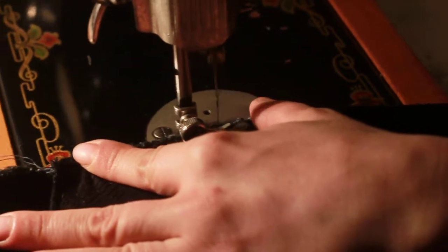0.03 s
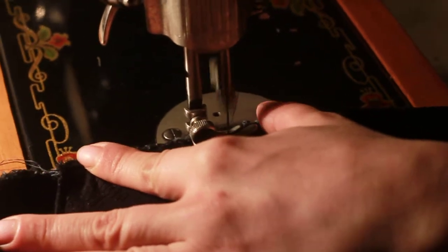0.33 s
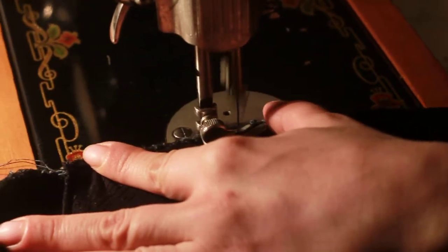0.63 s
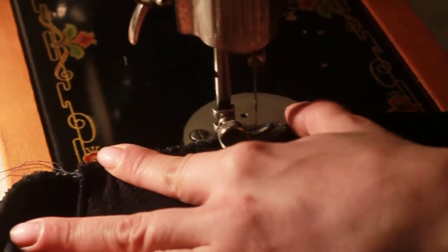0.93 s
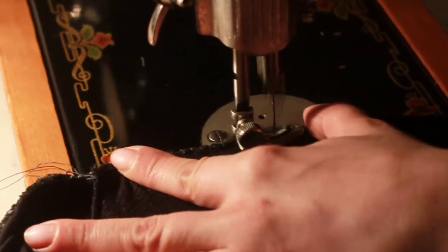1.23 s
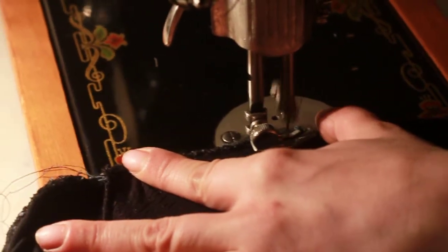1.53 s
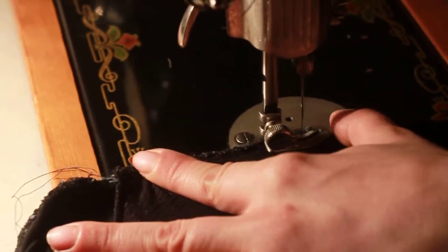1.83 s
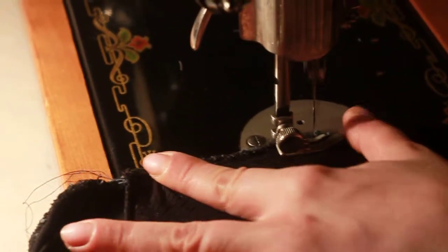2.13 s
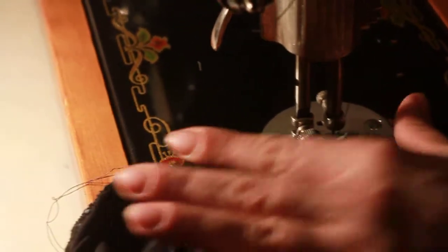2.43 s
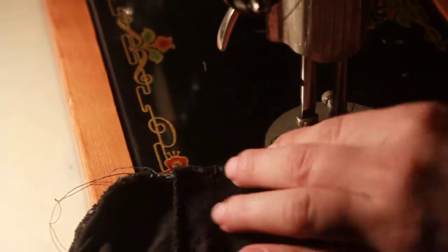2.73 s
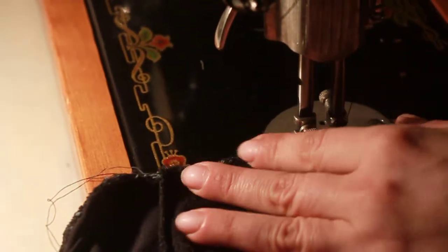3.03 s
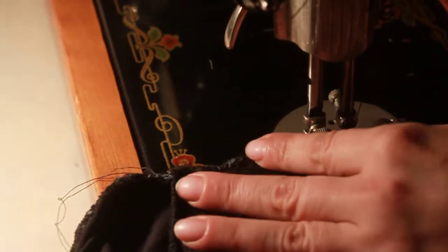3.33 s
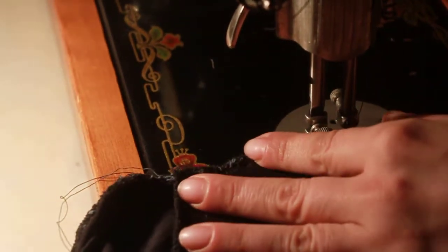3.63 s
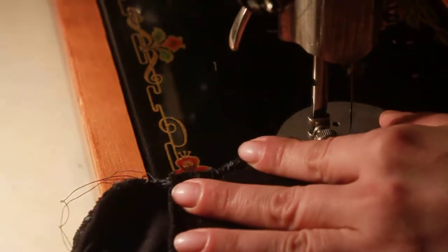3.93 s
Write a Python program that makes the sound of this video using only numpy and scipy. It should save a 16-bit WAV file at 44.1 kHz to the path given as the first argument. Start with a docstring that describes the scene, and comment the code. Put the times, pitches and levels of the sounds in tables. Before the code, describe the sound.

An old sewing machine clatters close by, about four stitches a second, with steel clacks, sliding hiss and thuds in its wooden table. It coasts to a stop at about 2.3 seconds. Faint cloth rustles, small clicks and two drip-like plinks follow over quiet room noise. A sharp, ringing metal click comes at 3.6 seconds, and the machine starts again at around 3.8 seconds.

```python
"""An old sewing machine rattles on a wooden table, about four stitches a second, over faint room noise.
Each stitch is a steel clack, a sharp snap, a thud in the table and the hiss of sliding steel.
The machine coasts to a stop. While the fabric is moved come soft rustles, small clicks, two
drip-like plinks and one ringing metal click in the small room. Then the machine starts again."""
import sys
import numpy as np
from scipy import signal
from scipy.fft import rfft, irfft
from scipy.io import wavfile

SR = 44100
rng = np.random.default_rng(int(sys.argv[2]) if len(sys.argv) > 2 else 0)


def inscribe(sig):
    """Save sig as 16-bit PCM at rate SR to the path in sys.argv[1].

    A 1-D sig is mono; a 2-D sig holds one channel per row.
    Samples are clipped to [-1, 1] before scaling.
    """
    pcm = np.round(np.clip(np.atleast_2d(sig).T, -1, 1) * 32767)
    wavfile.write(sys.argv[1], SR, pcm.astype(np.int16))


N = 176400
TIME = np.arange(N) / SR


def amp(db):
    """Turns decibels into gain."""
    return 10 ** (np.asarray(db) / 20)


def unit(x):
    """Scales to an average power of one."""
    return x / np.sqrt(np.mean(x ** 2) + 1e-20)


def curve(points, at):
    """Joins points with straight lines."""
    return np.interp(at, *np.transpose(points))


def spectrum(points, hz):
    """Joins points along a scale of octaves."""
    f, value = np.transpose(points)
    return np.interp(np.log(hz + 1), np.log(f), value)


def colour(x, points, resonances=()):
    """Gives a sound a broad tone colour, with ringing pitches on top."""
    size = 8192
    hz = np.fft.rfftfreq(size, 1 / SR)
    peaks = sum((amp(db) - 1) / (1 + (2 * (hz - f) / width) ** 2) for f, width, db in resonances)
    gain = amp(spectrum(points, hz)) * (1 + peaks)
    # make the ringing come after each hit, never before
    cepstrum = irfft(np.log(np.maximum(gain, 1e-6)))[:size // 2]
    cepstrum[1:] *= 2
    ring = irfft(np.exp(rfft(cepstrum, size)))
    return signal.oaconvolve(x, ring / np.linalg.norm(ring))[:N]


def resonate(x, hz, width_hz):
    """Filters twice around one pitch, which may glide."""
    spin = np.exp(2j * np.pi * np.cumsum(hz * np.ones(len(x))) / SR)
    decay = np.exp(-np.pi * width_hz / SR)
    for _ in range(2):
        x = 2 * (spin * signal.lfilter([1 - decay], [1, -decay], x / spin + 1e-18)).real
    return x


def contact(hit_s, db, fade_s, rise_s=.0001, spike=3):
    """A brief chatter swells to one hard touch and dies away."""
    shape = np.exp(-np.maximum((hit_s - TIME) / rise_s, (TIME - hit_s) / fade_s).clip(0, 60))
    chatter = rng.standard_normal(N)
    chatter[min(round(hit_s * SR), N - 1)] = spike
    return amp(db) * shape * chatter


def tone(start_s, hz, db, ring_s):
    """A struck note that falls 60 dB in ring_s."""
    t = np.maximum(TIME - start_s, 0)
    return amp(db - 60 * t / ring_s) * np.sin(2 * np.pi * hz * t)


def grains(per_s, spread_db):
    """Tiny random hits of uneven strength."""
    size = amp(spread_db * np.minimum(rng.exponential(1, N), 4))
    return unit(size * rng.choice([-1, 1], N) * (rng.random(N) < per_s / SR))


def flutter(hz, depth_db):
    """A quick random wavering of level."""
    slow = np.fft.rfftfreq(N, 1 / SR) < hz
    wobble = unit(irfft(rfft(rng.standard_normal(N)) * slow, N))
    return unit(amp(depth_db * wobble))


def jingle(per_s, spread_db, fade_s, count=24):
    """Four loose parts are shaken, each ringing at its own pitches."""
    t = np.arange(3000) / SR
    shake = grains(per_s, spread_db)
    part = rng.integers(0, 4, N)
    out = np.zeros(N)
    for k in range(4):
        hz = np.geomspace(900, 15000, count)[:, None] * rng.uniform(.93, 1.07, (count, 1))
        notes = np.sin(2 * np.pi * hz * t) * np.sqrt(hz) * rng.choice([-1, 1], (count, 1))
        out += signal.oaconvolve(shake * (part == k), notes.sum(0) * np.exp(-t / fade_s))[:N]
    return unit(out)


# ringing of the table and iron frame: pitch_hz, width_hz, lift_db
BODY_RINGS = [(116, 21, 4), (181.3, 18, 7.5), (258, 38, 7), (338, 29, 6.5), (480, 19, 5), (557, 36, 5.5),
              (646, 17, 5.5), (741, 13, 3), (834, 15, 5), (1414, 30, 6), (1723, 45, 4.5), (2236, 80, 5),
              (3516, 82, 5.5), (3600, 77, 6), (3750, 64, 8), (3830, 87, 2)]
# ringing of the light steel parts: pitch_hz, width_hz, lift_db
STEEL_RINGS = [(1850, 45, 3), (2030, 150, 4), (4600, 32, 2.5), (5250, 20, -8), (6006, 68, 5.5),
               (6460, 29, -7), (8000, 30, -13), (9730, 140, 8), (10500, 90, 1.5), (11160, 80, 4.5),
               (12000, 110, 0.5), (12700, 85, -3), (14200, 45, -9), (14200, 140, 6.5), (14300, 160, 3.5),
               (15000, 100, 0)]
def through_frame(x, tone_colour):
    """Table, frame and steel parts ring along with a sound."""
    return colour(x, tone_colour, BODY_RINGS + STEEL_RINGS)


# how hard the machine runs: time_s, level_db
EFFORT = [(0, -4), (.2, -2), (.5, 0), (.9, 0), (1.3, 1), (1.5, -3), (1.6, -5), (1.7, 0.5), (2.0, -1.5),
          (2.19, -2), (2.28, -5.5), (2.36, -23), (2.47, -38), (3.7, -15), (3.81, -7.5), (3.912, -12.5),
          (3.93, 1.5), (4, 1.5)]
def running():
    """Four noises rise and fall as the wheel turns, once a stitch."""
    outer_turns_per_s = 3.1  # before the first stitch and after the last
    hits = [row[0] for row in STITCHES]
    turn = np.interp(TIME, hits, np.arange(len(hits)))
    turn = (turn + outer_turns_per_s * (TIME - np.clip(TIME, hits[0], hits[-1]))) % 1
    effort_db = curve(EFFORT, TIME)
    return sum(noise(turn, effort_db) for noise in (rumble, rattle, slide, fizz))


# rumble through one turn: turn_share (0 to 1), gain_db
RUMBLE_TURN = [(0, -4), (.08, -6), (.2, 1), (.32, -5), (.45, -6), (.7, -4), (.9, -6.5), (1, 1.5)]
# its colour: pitch_hz, gain_db
RUMBLE_COLOUR = [(25, -46), (50, -38), (100, -10), (170, -11), (290, 0), (420, -5), (600, -0.5),
                 (900, -5.5), (2000, -26.5), (16000, -70)]
def rumble(turn, effort_db):
    """Many tiny knocks shake the table."""
    knocks = grains(1500, 1.3) * amp(-35.5 + effort_db + curve(RUMBLE_TURN, turn))
    return through_frame(knocks, RUMBLE_COLOUR)


# rattle through one turn: turn_share, gain_db
LINKAGE_TURN = [(0, -0.5), (.12, 0.5), (.3, -0.5), (.42, -2.5), (.51, 1.5), (.62, -4.5), (.8, -6.5),
                (.92, -5), (1, 4.5)]
# its colour: pitch_hz, gain_db
LINKAGE_COLOUR = [(100, -26.5), (500, -10), (900, -1.5), (1400, 0), (2000, -3.5), (2700, -2), (3800, -2.5),
                  (4800, -5), (6000, -16), (8000, -11), (16000, -39)]
def rattle(turn, effort_db):
    """Loose linkages tap and jingle."""
    taps = amp(-41) * grains(3000, 3.1) * flutter(hz=89, depth_db=3.5)
    taps += amp(-38) * jingle(per_s=300, spread_db=2.5, fade_s=.007)
    return through_frame(taps * amp(effort_db + curve(LINKAGE_TURN, turn)), LINKAGE_COLOUR)


# sliding through one turn: turn_share, gain_db
SCRAPE_TURN = [(0, -14), (.1, -8.5), (.5, -10.5), (.65, -3), (.76, 2), (.88, -2.5), (1, 3.5)]
# its colour: pitch_hz, gain_db
SCRAPE_COLOUR = [(300, -17), (2300, -21), (2700, 3.5), (3000, 6.5), (3300, -1), (3700, 6), (4300, -1.5),
                 (8000, -20), (16000, -38)]
# its squeal: turn_share, pitch_hz
SQUEAL_PITCH = [(0, 2750), (.55, 2660), (.68, 3000), (.78, 2934), (.86, 3040), (.95, 2750), (1, 2860)]
def slide(turn, effort_db):
    """Sliding steel hisses and squeals."""
    scrape = rng.standard_normal(N) * flutter(hz=90, depth_db=1.5)
    hiss = amp(-41.5) * through_frame(scrape, SCRAPE_COLOUR)
    squeal = amp(-42.5) * unit(resonate(scrape, curve(SQUEAL_PITCH, turn), width_hz=700))
    return (hiss + squeal) * amp(effort_db + curve(SCRAPE_TURN, turn))


# fine chatter through one turn: turn_share, gain_db
CHATTER_TURN = [(0, -9), (.08, 2), (.14, -33), (.25, -1.5), (.4, -9), (.7, -9), (.9, -8), (.95, -5),
                (1, -7)]
# its colour: pitch_hz, gain_db
CHATTER_COLOUR = [(1000, -27), (5000, -0.5), (6500, 8), (8300, -14), (10400, 7.5), (12000, -4.5),
                  (14000, -0.5), (16000, -5)]
def fizz(turn, effort_db):
    """Fine, high chatter fades faster than the rest as the machine stops."""
    chatter = amp(-44) * grains(11000, 1.3) * flutter(hz=111, depth_db=8)
    chatter += amp(-40.5) * jingle(per_s=600, spread_db=7, fade_s=.0013)
    return through_frame(chatter * amp(1.3 * effort_db + curve(CHATTER_TURN, turn)), CHATTER_COLOUR)


# colour of the room noise: pitch_hz, gain_db
AIR_COLOUR = [(24, -37), (40, -15), (189, -1), (231, -12), (276, 2.5), (329, -9), (491, -8.5), (790, -14),
              (1300, -16), (1810, -6), (2150, -10), (3740, -16), (7000, -19.5), (14100, -25), (16000, -25)]
# thin whine: time_s, level_db
WHINE_LEVEL = [(0, -72), (2.5, -62), (2.8, -61), (3.15, -64), (3.225, -48), (3.28, -63), (3.34, -57),
               (3.48, -64), (3.54, -49.5), (3.6, -44), (3.68, -57.5)]
# low hum: pitch_hz, level_db
HUM_NOTES = [(50, -71), (100, -72)]
def background():
    """Quiet room noise with a low hum and a thin, wavering whine."""
    whine = unit(resonate(rng.standard_normal(N), hz=1845, width_hz=70))
    hum = sum(amp(db) * np.sin(2 * np.pi * hz * TIME) for hz, db in HUM_NOTES)
    air = amp(-56) * colour(rng.standard_normal(N), AIR_COLOUR)
    return air + amp(curve(WHINE_LEVEL, TIME)) * whine + hum


# the clack of each stitch: hit_s, level_db, fade_s, knock_db
STITCHES = [(.022, -22, 0.0046, -27), (.255, -20, 0.0051, -33), (.492, -17.5, 0.0053, -25.5),
            (.725, -20.5, 0.0078, -24.5), (.938, -16.5, 0.003, -26), (1.178, -17, 0.0054, -22),
            (1.413, -15, 0.0031, -29), (1.635, -32, 0.0034, -38), (1.862, -23.5, 0.012, -25),
            (2.095, -23, 0.0093, -27.5), (2.355, -59, .012, -45), (3.947, -26, 0.0098, -21)]
# colours of clack and knock: pitch_hz, gain_db
CLACK_COLOUR = [(100, -1), (600, -3.5), (2000, -4), (3600, 2.5), (5500, -1), (8000, -10.5), (9300, -5.5),
                (10300, 4), (12000, -1.5), (14200, 4), (16000, -2.5)]
KNOCK_COLOUR = [(30, -47), (80, -33), (250, -12), (600, 1), (800, 0.5), (1050, 4), (1500, -0.5),
                (2100, 2.5), (3500, -18), (8000, -5)]
def clacks():
    """Steel strikes at each stitch, with a soft swish and a duller knock."""
    hits = sum(contact(s, db, fade, rise_s=.0015, spike=5.2) for s, db, fade, _ in STITCHES)
    swishes = sum(contact(s, db - 12.5, fade_s=.016, rise_s=.019) for s, db, _, _ in STITCHES)
    knocks = sum(contact(s, db, fade_s=.011, rise_s=.0041) for s, _, _, db in STITCHES)
    return through_frame(hits + swishes, CLACK_COLOUR) + through_frame(knocks, KNOCK_COLOUR)


# snaps of the mechanism: hit_s, level_db, treble_db
SNAPS = [(.057, -20, 2.5), (0.2901, -18.5, 2), (0.524, -19, 2), (.758, -22, 9), (0.973, -18, 3.5),
         (1.209, -22, 2), (1.447, -26.5, 9.5), (1.564, -35, 10.5), (1.6575, -29.5, 11), (2.138, -16, -1),
         (2.222, -20.5, -11), (3.995, -13.5, 0)]
# their colour: pitch_hz, gain_db
SNAP_COLOUR = [(100, -17), (1000, -11.5), (2800, 3), (4100, 11.5), (5200, 1.5), (8000, -6.5), (10500, 1.5),
               (12500, 1), (14500, 1.5), (16000, -8.5)]
def snaps():
    """The mechanism snaps after the clack, sometimes bright, sometimes dull."""
    plain, scaled = np.zeros((2, N))
    for s, db, treble_db in SNAPS:
        hit = contact(s, db, fade_s=.0036, rise_s=.00033, spike=2.8)
        plain += hit
        scaled += hit * amp(treble_db)
    treble_share = np.clip((np.fft.rfftfreq(N, 1 / SR) - 4500) / 3000, 0, 1)
    treble_change = irfft(rfft(scaled - plain) * treble_share, N)
    return through_frame(plain + treble_change, SNAP_COLOUR)


# soft thumps in the table: peak_s, level_db, pitch_hz
THUMPS = [(.09, -37.5, 296), (.3, -39, 267), (.555, -33.5, 316), (.8, -38.5, 260), (.975, -47, 142),
          (1.019, -36.5, 304), (1.231, -32.5, 245), (1.487, -38, 320), (1.705, -41.5, 303),
          (1.911, -37, 265), (2.122, -40, 247), (2.195, -41, 322), (2.736, -55, 350), (3.01, -57, 185),
          (3.291, -53, 246), (3.435, -51.5, 227), (3.484, -53, 274), (3.781, -45, 270)]
def thumps():
    """Short pushes from the drive and the hand boom in the wood."""
    rise_s = .0121
    out, t = np.zeros(N), np.arange(SR // 6) / SR
    shape = t / rise_s * np.exp(1 - t / rise_s)
    for s, db, hz in THUMPS:
        boom = shape * resonate(rng.standard_normal(len(t)), hz, width_hz=170)
        boom *= amp(db) * np.linalg.norm(shape) / np.linalg.norm(boom)
        place = out[round((s - rise_s) * SR):][:len(t)]
        place += boom[:len(place)]
    return out


# ticks of the linkages: hit_s, level_db
TICKS = [(.123, -30.5), (.337, -37), (0.37, -32), (0.43, -27.5), (0.6, -31), (.818, -27), (0.832, -24.5),
         (0.872, -25.5), (1.015, -42), (1.06, -28.5), (1.097, -32), (1.247, -34), (1.291, -27),
         (1.529, -30), (1.7335, -36), (1.753, -38), (1.797, -30.5), (1.964, -24.5), (2.1928, -28),
         (2.218, -22), (2.282, -34.5), (3.924, -33), (3.946, -19.5), (3.959, -23)]
# their colour: pitch_hz, gain_db
TICK_COLOUR = [(100, -22.5), (700, -4.5), (1900, 0), (2600, 2.5), (3700, 2), (5000, -2.5), (8000, -11),
               (11000, -9), (16000, -9)]
def ticks():
    """The linkages touch lightly."""
    hits = sum(contact(s, db, fade_s=.0053, rise_s=.00057) for s, db in TICKS)
    return through_frame(hits, TICK_COLOUR)


# single loose parts: start_s, pitch_hz, level_db, ring_s
PINGS = [(.337, 1850, -27.5, 0.047), (.829, 1736, -30, .06), (1.437, 1910, -29, 0.05),
         (1.851, 1175, -29.5, 0.11), (2.1926, 1954, -24.5, 0.06), (3.813, 1416, -41, 0.53),
         (3.945, 1424, -22.5, 0.12)]
def pings():
    """A loose steel part is knocked and rings at one pitch."""
    return sum(tone(*ping) for ping in PINGS)


# cloth brushing under the hand: peak_s, level_db, half_length_s
RUSTLES = [(2.34, -56, 0.017), (2.432, -58, .008), (2.473, -56, .015), (2.708, -49.5, 0.019),
           (2.879, -51.5, .012), (2.957, -46, 0.015), (3.053, -52.5, 0.02), (3.13, -53, .02),
           (3.287, -54, .018)]
# its colour: pitch_hz, gain_db
CLOTH_COLOUR = [(300, -25), (2000, -2), (4500, 5), (8000, -3), (13000, -3), (16000, -10)]
def fabric():
    """Fibres catch and let go as the cloth is pushed along."""
    strokes = sum(amp(db) * np.exp(-((TIME - s) / half) ** 2) for s, db, half in RUSTLES)
    return colour(grains(9000, 1.6) * strokes, CLOTH_COLOUR)


# clicks in the pause: hit_s, relative_db, fade_s, pitch_hz
CLICKS = [(2.539, -32.5, 0.0023, 3500), (2.545, -34.5, 0.0041, 2580), (2.6647, -38.5, .001, 3900),
          (2.686, -34, 0.0032, 3800), (2.694, -34, 0.0037, 2470), (2.855, -41.5, 0.0019, 2000),
          (2.87, -48, 0.0037, 2600), (2.955, -30, 0.0032, 4140), (3.098, -34.5, 0.0025, 2050),
          (3.362, -27.5, 0.0009, 1390), (3.365, -28.5, 0.0022, 3020), (3.556, -34, 0.0055, 2350),
          (3.816, -26.5, 0.00087, 2740), (3.820, -33, 0.00044, 3350)]
# their colour: pitch_hz, gain_db
CLICK_COLOUR = [(100, -30), (800, -19), (1400, -6), (2300, 1), (3500, -2), (5000, -3.5), (7000, -13),
                (11000, -24), (16000, -30)]
def small_clicks():
    """Light, dull clicks, each a little hollow at its own pitch."""
    out = np.zeros(N)
    for s, db, fade, hz in CLICKS:
        click = contact(s, db, fade, spike=5.2)
        hollow = signal.lfilter(*signal.iirpeak(hz, 2, fs=SR), click)
        out += click + amp(-3) * hollow
    return amp(-2) * colour(out, CLICK_COLOUR)


# drip-like notes in two clusters: start_s, pitch_hz, level_db
PLINKS = [(2.6653, 1496, -29), (2.672, 1566, -31), (2.691, 1570, -38), (3.2015, 1350, -35.5),
          (3.210, 1470, -42)]
def plinks():
    """Short notes rise in pitch as they die."""
    fade_s, rise_per_s = .0055, 8.2
    out = np.zeros(N)
    for s, hz, db in PLINKS:
        t = np.clip(TIME - s, 0, .1)
        cycles = hz * (t + rise_per_s * t ** 2 / 2)
        out += amp(db) * np.exp(-t / fade_s) * np.sin(2 * np.pi * cycles)
    return out


# the loud metal click and its bounce: hit_s, level_db
METAL_HITS = [(3.642, -11), (3.6442, -15.5)]
# its colour: pitch_hz, gain_db
METAL_COLOUR = [(100, -38), (400, -23), (950, -22), (1280, -12), (1700, -20.5), (3000, -13), (3700, -2),
                (4700, -0.5), (5600, -19), (10000, -20), (11500, -28), (14000, -25), (16000, -36)]
# its ringing notes: pitch_hz, relative_db, ring_s
METAL_NOTES = [(2260, -5.5, 0.32), (3820, 0, .19), (4000, -13, 0.2), (4600, -8, 0.3), (4640, -10, 0.23),
               (6700, -13, 0.25), (7725, -8, 0.27), (8274, -9, 0.3), (9232, -8, 0.25), (10310, -10, 0.2)]
def metal_click():
    """A steel part snaps home, bounces once and rings."""
    hits = sum(contact(s, db, fade_s=.0029, spike=2.4) for s, db in METAL_HITS)
    ring = sum(tone(METAL_HITS[0][0], *note) for note in METAL_NOTES)
    return room(colour(hits, METAL_COLOUR), echo_db=-5) + amp(-31) * ring


# time the room's echo takes to fall 60 dB: pitch_hz, ring_s
ROOM_RING = [(100, 0.14), (1000, 0.49), (2600, 0.24), (7000, 0.19), (16000, 0.19)]
def room(x, echo_db, rise_s=.0036):
    """Adds a soft echo in which the middle pitches last longest."""
    hz, t, bands = signal.stft(rng.standard_normal(SR // 2), SR, nperseg=256)
    bands *= amp(-60 * t / spectrum(ROOM_RING, hz)[:, None])
    tail = signal.istft(bands, SR, nperseg=256)[1]
    tail *= np.minimum(np.arange(len(tail)) / SR / rise_s, 1)
    return x + amp(echo_db) * signal.oaconvolve(x, tail / np.linalg.norm(tail))[:N]


def scene():
    """The machine close by, the small clicks further into the room."""
    strikes = room(clacks() + snaps() + ticks() + pings(), echo_db=-7)
    motion = room(running() + thumps() + fabric(), echo_db=-10.5)
    pause = room(small_clicks(), echo_db=1.5) + room(plinks(), echo_db=-7) + metal_click()
    return (strikes + motion + pause + background())[None]


def record(dry):
    """Trims the deepest rumble and the highest treble."""
    low_hz, high_hz = 52, 16000
    thin = signal.sosfilt(signal.butter(4, low_hz, "high", fs=SR, output="sos"), dry)
    treble_cut = signal.firwin(401, high_hz, window=("kaiser", 9), fs=SR)
    return signal.oaconvolve(thin, treble_cut[None], "same")


dry = scene()
out = record(dry)
inscribe(out)
```